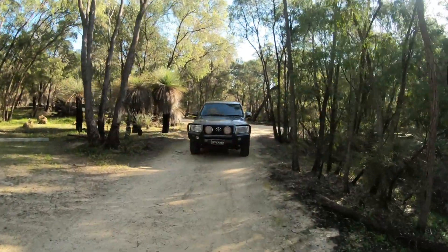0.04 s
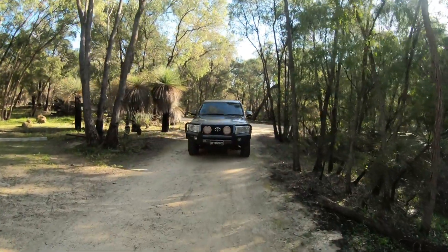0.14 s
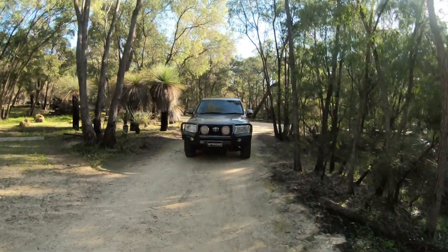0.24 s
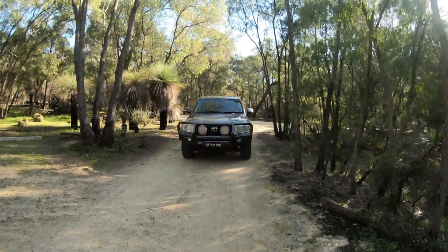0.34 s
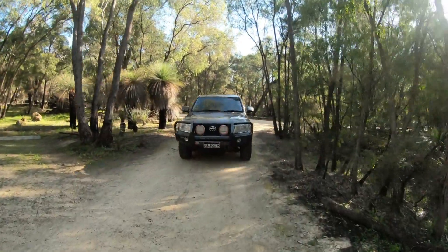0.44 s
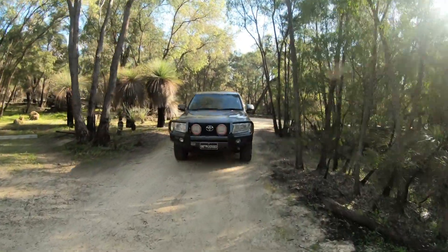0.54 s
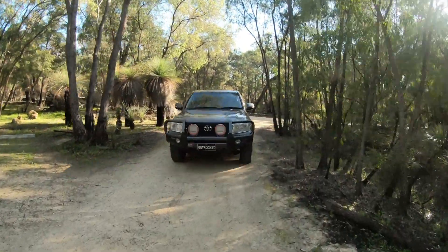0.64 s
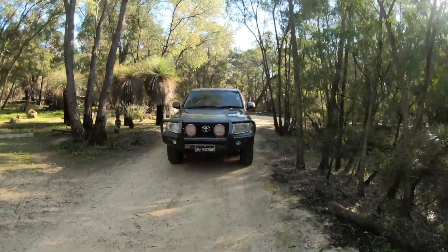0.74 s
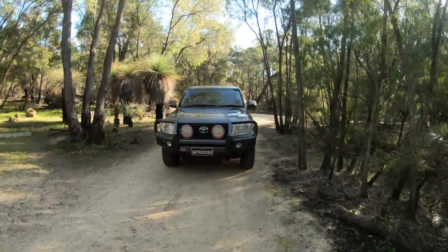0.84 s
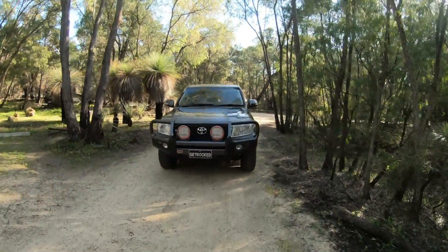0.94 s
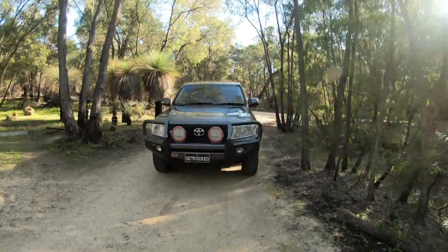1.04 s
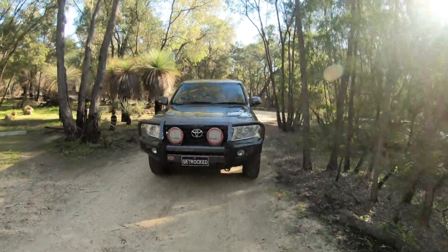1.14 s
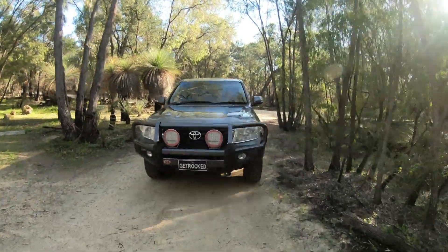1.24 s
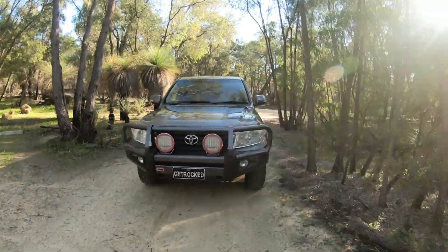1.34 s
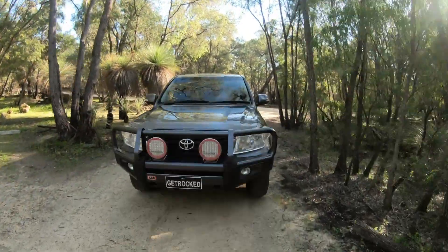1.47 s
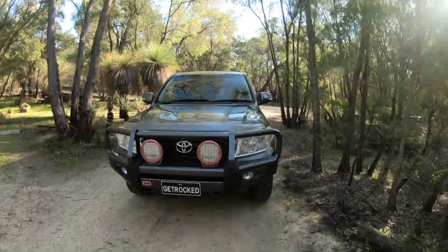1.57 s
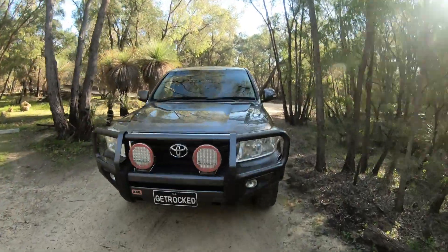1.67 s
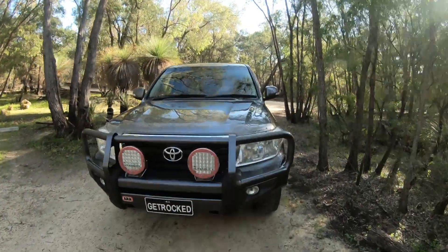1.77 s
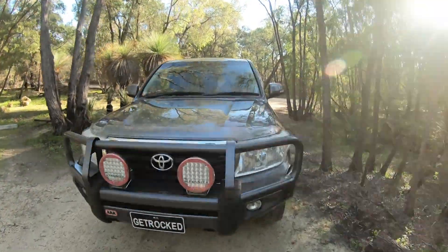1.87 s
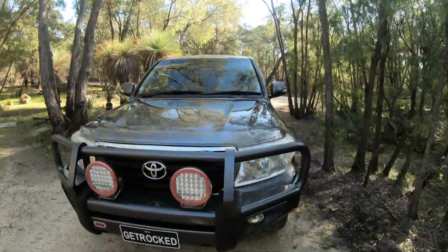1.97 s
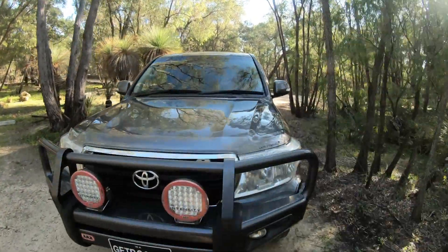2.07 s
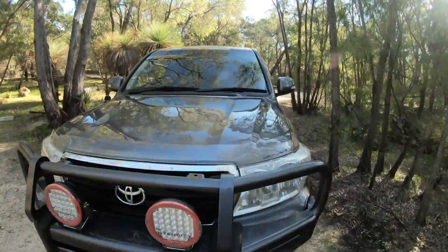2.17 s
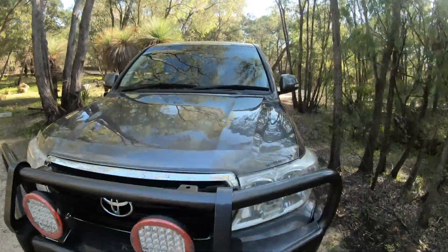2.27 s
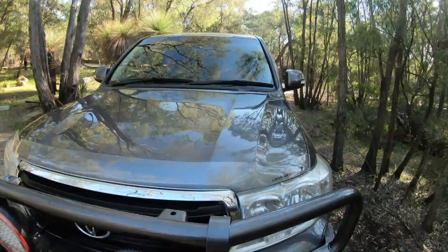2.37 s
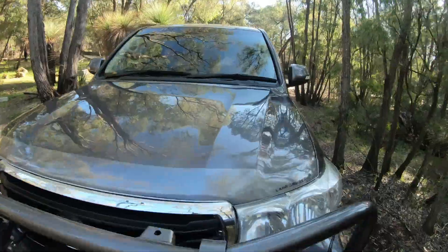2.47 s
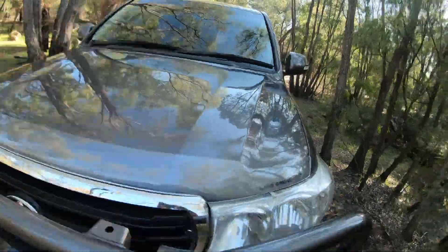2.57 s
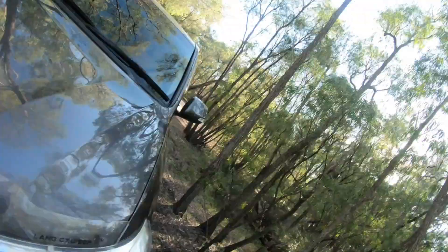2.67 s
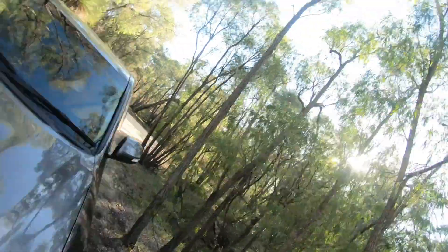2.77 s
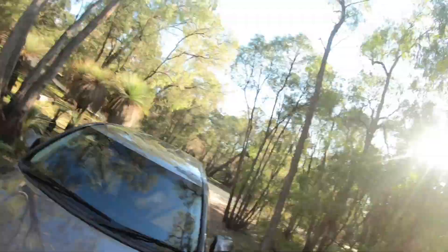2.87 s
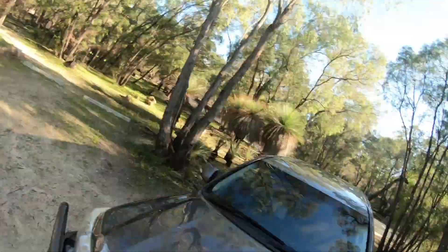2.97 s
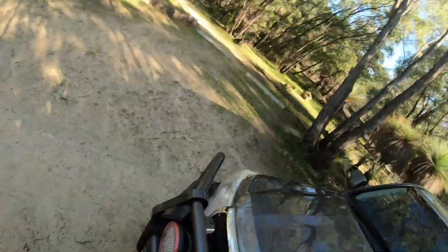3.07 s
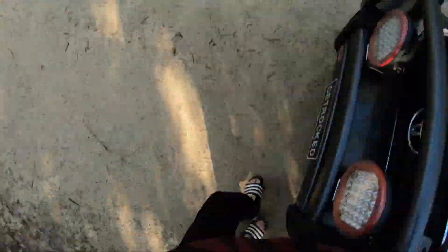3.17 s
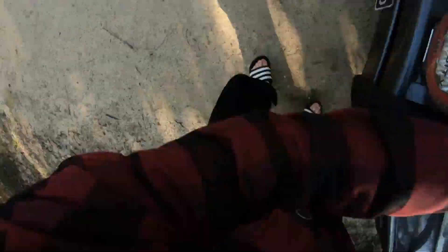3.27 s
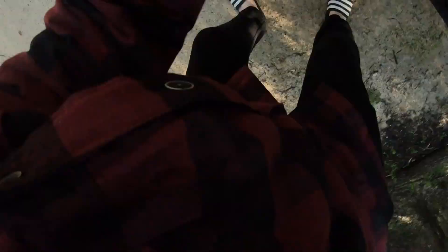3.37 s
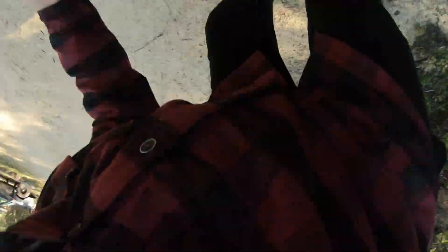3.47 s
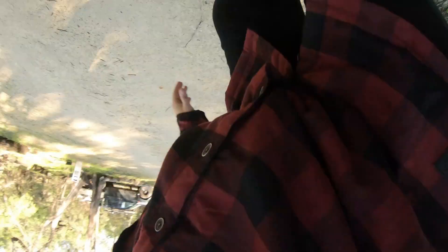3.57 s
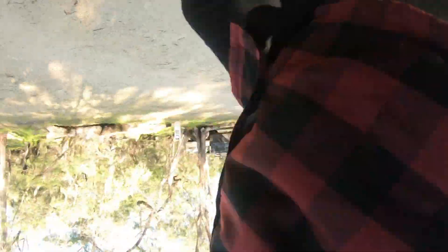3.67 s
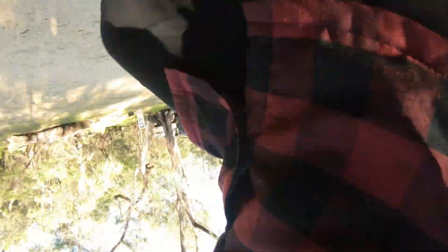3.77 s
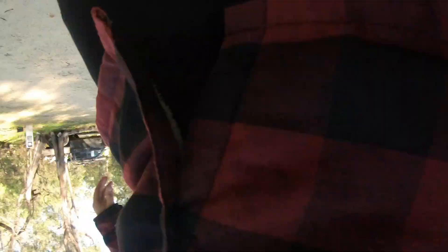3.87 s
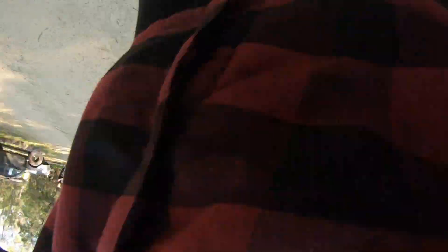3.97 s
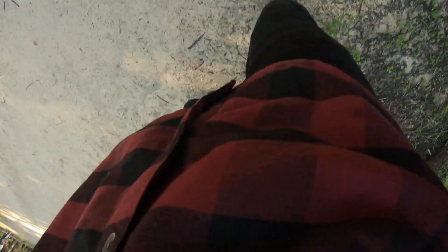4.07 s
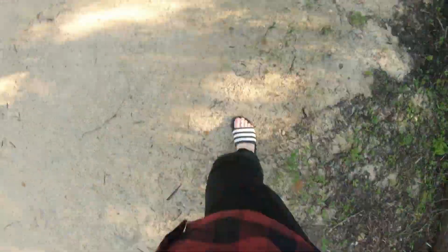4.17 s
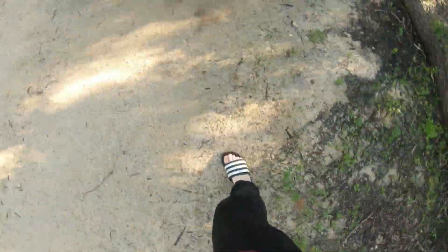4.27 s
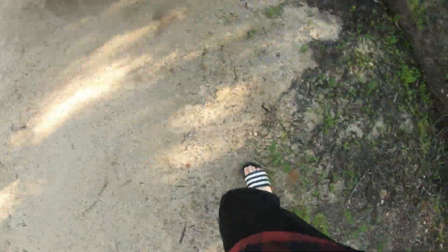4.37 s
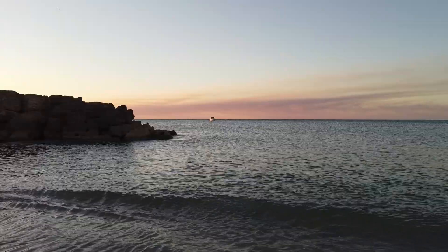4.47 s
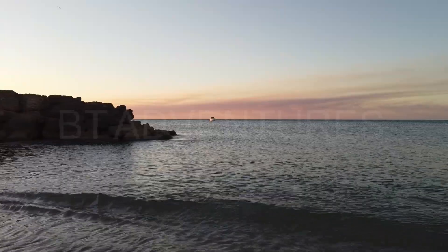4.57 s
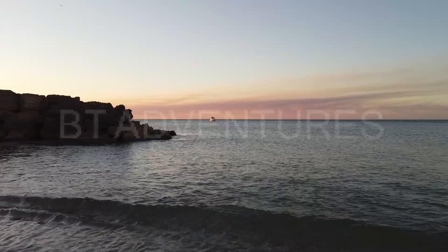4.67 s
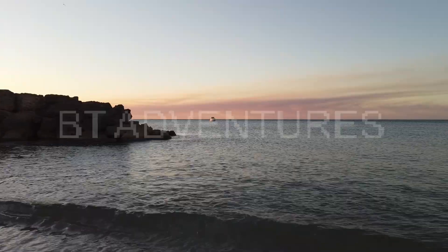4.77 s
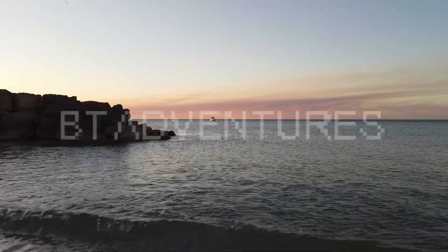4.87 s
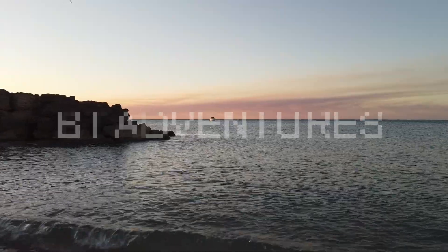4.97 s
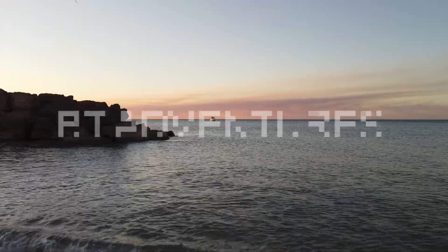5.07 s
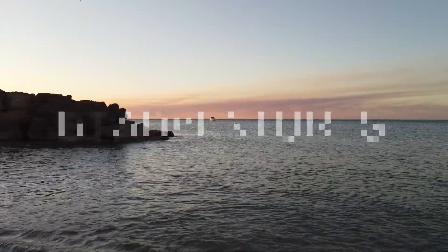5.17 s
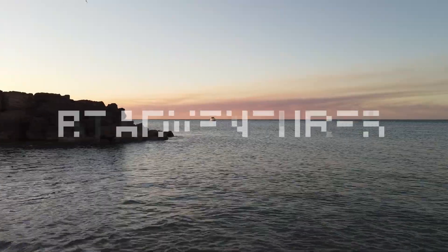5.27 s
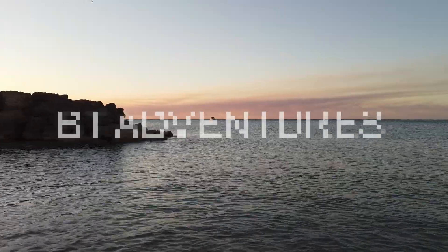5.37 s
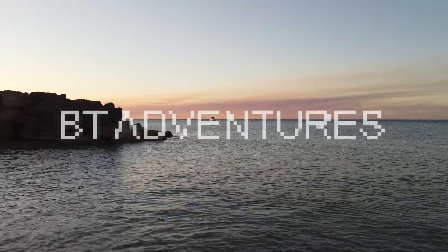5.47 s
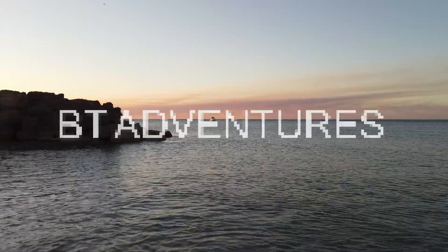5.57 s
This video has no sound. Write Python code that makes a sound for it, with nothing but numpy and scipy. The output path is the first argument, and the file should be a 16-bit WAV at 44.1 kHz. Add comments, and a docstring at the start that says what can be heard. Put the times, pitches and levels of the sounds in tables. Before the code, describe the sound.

Approaching diesel clatter and crunching tyres give way to handling booms and cloth rustle, a tiny silent gap, then a wave washing ashore.

```python
"""A bumpy dirt track: a diesel four-wheel-drive rolls up to a hand-held camera and brakes, then a silent gap and a beach.
The engine is firing pulses, low tones and knock-gated noise; tyres are noise, grains and ringing stones; a joint squeaks.
The camera is gripped and swung: taps ring its case, the grip booms, cloth rustles, air buffets the ports.
The beach fades in as coloured noise for wash, crest and foam, with ringing bubbles."""
import sys
import numpy as np
from scipy import signal
from scipy.fft import rfft, irfft, next_fast_len
from scipy.io import wavfile
from scipy.ndimage import uniform_filter1d, map_coordinates

SR = 44100
rng = np.random.default_rng(int(sys.argv[2]) if len(sys.argv) > 2 else 0)


def digitize_waveform(pressure):
    """Quantize a signal to 16-bit integers and store it at the path in sys.argv[1].

    Rows of a 2-D input are taken as channels; values are limited to [-1, 1].
    """
    field = np.atleast_2d(pressure).T
    bounded = np.clip(field, -1, 1)
    quanta = np.round(bounded * 32767).astype(np.int16)
    wavfile.write(sys.argv[1], SR, quanta)


N = 248283

# left-right likeness of the track's sounds: hz, correlation
TRACK_ALIKE = [(60, 0.98), (200, 1), (500, 0.98), (1000, 0.64), (2400, 0.16), (6000, 0.56), (15000, 0.18)]
# labouring over ruts: centre_s, half_s, throb_db, clatter_db, grit_db (all added)
RUTS = [(0.95, 0.18, -1.5, 1.3, 2), (1.808, 0.14, 2, 0.5, 1.5)]
BEACH_S = 4.612


def amp(db):
    """Decibels to gain."""
    return 10 ** (np.asarray(db) / 20)


def unit(x):
    """Scale to rms 1."""
    return x / np.sqrt(np.mean(x ** 2) + 1e-20)


def clock():
    """Time of every sample in seconds."""
    return np.arange(N) / SR


def along(points, hz):
    """Interpolate (hz, value) points on a log frequency axis."""
    f, v = np.transpose(points)
    return np.interp(np.log(hz + 1), np.log(f + 1), v)


def curves(rows):
    """One value per sample for each column after the time."""
    s, *cols = np.transpose(rows)
    return [np.interp(clock(), s, c) for c in cols]


def ramp(start_s, end_s):
    """0 at start_s, 1 at end_s, straight between, held outside."""
    return np.clip((clock() - start_s) / (end_s - start_s), 0, 1)


def bell(centre_s, half_s):
    """Gaussian swell of height 1."""
    return np.exp(-((clock() - centre_s) / half_s) ** 2 / 2)


def swells(rows):
    """Summed dB over time of (centre_s, half_s, dB, ..) rows, one curve per dB column."""
    return sum(np.outer(added_db, bell(s, half_s)) for s, half_s, *added_db in rows)


def wobble(rate_hz, size=N):
    """Smooth random curve with rate_hz knots a second."""
    knots = rng.standard_normal(int(size * rate_hz / SR) + 4)
    return map_coordinates(knots, [np.arange(size) / SR * rate_hz], order=2)


def filtered(x, response):
    """Apply a frequency response to x."""
    n = x.shape[-1]
    m = next_fast_len(n + 8192)
    return irfft(rfft(x, m) * response(np.fft.rfftfreq(m, 1 / SR)), m)[..., :n]


def coloured(x, spectrum):
    """Shape x by a spectrum, at rms 1."""
    return unit(filtered(x, lambda hz: amp(along(spectrum, hz))))


def stereo(pair, spectrum, alike):
    """Blend two unrelated signals into a coloured left and right of rms 1."""
    def mid_side_gains(hz):
        turn = np.arccos(np.clip(along(alike, hz), -1, 1)) / 2
        return amp(along(spectrum, hz)) * [np.cos(turn), np.sin(turn)]
    mid, side = filtered(pair, mid_side_gains)
    return unit(np.array([mid + side, mid - side]))


def noise(size=N):
    """Two unrelated white noises."""
    return rng.standard_normal((2, size))


def grains(rate_hz, spread_db):
    """Two streams of tiny random impacts, a few much larger than the rest."""
    hits = rng.random((2, N)) < rate_hz / SR
    signs = rng.choice([-1, 1], (2, N))
    sizes = amp(spread_db * np.minimum(rng.exponential(size=(2, N)), 4))
    return unit(hits * signs * sizes)


def patchy(pair, depth_db):
    """Give noise patches of random gain, a few hundred Hz wide and tens of ms long."""
    z = signal.stft(pair, nperseg=1024)[2]
    field = uniform_filter1d(rng.standard_normal(z.shape[1:]), size=5, axis=0)
    field = uniform_filter1d(field, size=5, axis=1)
    return signal.istft(z * amp(depth_db * unit(field)), nperseg=1024)[1][:, :N]


def pings(start_s, end_s, count, hz, octaves, cycles, spread_db):
    """Scatter of tiny rings, rms 1 within its time span, each with its own pitch, size and side."""
    t = np.arange(SR // 64) / SR
    when, side = rng.random((2, count, 1))
    pitch = np.clip(hz * 2 ** (octaves * rng.standard_normal((count, 1))), 300, 12000)
    strength = amp(spread_db * np.minimum(rng.exponential(size=(count, 1)), 3))
    rings = strength * np.sin(2 * np.pi * pitch * t) * amp(-60 * pitch * t / cycles)
    at = ((start_s + when * (end_s - start_s)) * SR).astype(int) + np.arange(len(t))
    pair = [np.bincount(at.ravel(), (rings * np.sqrt(share)).ravel(), N)[:N] for share in (side, 1 - side)]
    return unit(np.array(pair)) * np.sqrt((end_s - start_s) * SR / N)


def causal(gain, size):
    """Minimum-phase ring of a body with this gain over frequency."""
    cepstrum = irfft(np.log(np.maximum(gain(np.fft.rfftfreq(2 * size, 1 / SR)), 1e-6)))
    cepstrum[1:size] *= 2
    cepstrum[size + 1:] = 0
    return irfft(np.exp(rfft(cepstrum)))[:size]


def panned(db):
    """Left and right gains for a left-right level difference."""
    return amp(np.array([[db], [-db]]) / 2)


def add(track, s, sound):
    """Mix a short sound into the track at time s."""
    part = track[:, max(round(s * SR), 0):][:, :sound.shape[-1]]
    part += sound[..., :part.shape[-1]]


def by_distance(at_1m_db, loss_db):
    """Level that loses loss_db with each doubling of the truck's distance."""
    # truck rolls up and stops, then the camera is carried off: time_s, distance_m
    distance = [(0, 7.4), (1, 3.3), (2, 1.63), (2.5, 1.24), (3.3, 1.44), (3.8, 2.57), (4.46, 4.1)]
    return at_1m_db - loss_db * np.log2(np.maximum(curves(distance)[0], .5))


def leaning():
    """Left and right gains of clatter and tyres as the camera turns."""
    # sideways lean: time_s, left_right_db
    lean = [(0, -2), (.7, -3), (1.15, -1), (1.7, -4.5), (2.35, -3.5), (2.7, 0), (3.2, .3)]
    lean_db, = curves(lean)
    return amp(np.array([lean_db, -lean_db]) / 2)


def throb(firing, count, strength, first_db=-7.0, second_db=-7, order_loss_db=2.5):
    """Each firing pushes the exhaust; gas noise and the first two firing orders join in."""
    # exhaust spectrum: hz, density_db_per_hz
    exhaust = [(13, -38.5), (22, 9), (48, -17.5), (77, 0), (144, -7), (167, -7.5), (195, -6.5), (243, -8.5),
               (275, -15), (306, -21.5), (400, -24.5), (520, -42), (880, -120)]
    pulses = np.diff(count, prepend=0) * strength
    out = 0.35 * coloured(pulses, exhaust) + 0.83 * stereo(noise(), exhaust, TRACK_ALIKE)
    near = amp(by_distance(0, order_loss_db))  # deep orders come forward as the truck closes in
    first = amp(first_db + 1.8 * wobble(7.5)) * np.sin(2 * np.pi * firing)
    second = amp(second_db + 2.6 * wobble(8.3)) * np.sin(4 * np.pi * firing)
    out += near * np.sqrt(2) * (first + second)
    return amp(by_distance(at_1m_db=-32.5, loss_db=2.4) + swells(RUTS)[0]) * out


def clatter(firing, count, strength, scatter_db=0.8, block_hz=900, block_sharpness=0.34):
    """Diesel knock: each firing gates a burst of metallic noise; the block's low notes ring on between."""
    # engine block from the front: hz, density_db_per_hz
    block = [(210, -37), (350, -15), (409, -11.5), (447, 0.5), (706, 2.5), (780, -1), (1160, 1.5),
             (1360, -2), (1610, 2.5), (1940, -6.5), (2650, -11.5), (3130, -7), (3460, -17.5), (3830, -23.5),
             (5000, -29.5), (6500, -44), (11000, -120)]
    # engine block from behind the holder's body: hz, density_db_per_hz
    block_behind = [(200, -31), (330, -5), (450, -11), (600, -1.5), (850, -2), (1120, 1.5), (1380, -4.5),
                    (1600, 1.5), (2100, -10), (2550, -11), (3050, -12), (3600, -14.5), (4400, -17.5),
                    (5300, -26.5), (6300, -21.5), (8000, -42), (11000, -62)]
    # knock blurred at first, growing ever more distinct: time_s, sharpness_0_to_1
    knock_sharpness = [(.6, .17), (1.35, .36), (2.2, .44), (3.9, .6)]
    # camera turns away behind the holder's body, then faces the engine: time_s, added_db
    shade = [(2.6, 2.5), (2.82, -9.5), (3.45, -4.5), (3.62, -1), (3.7, 1), (4.05, 0.7), (4.26, 5),
             (4.3, 9.5), (4.46, 7.5)]
    sharpness, = curves(knock_sharpness)
    force = strength * amp(scatter_db * rng.standard_normal(400)[count])
    knock = unit(force * np.exp(sharpness * np.cos(2 * np.pi * firing) - sharpness ** 2 / 2))
    metal = unit(patchy(noise(), depth_db=2.5)) + .5 * grains(rate_hz=980, spread_db=2.5)
    ringing = filtered(metal, lambda hz: 1 / (1 + (hz / block_hz) ** 6))
    rattle = knock * (metal - ringing) + unit(knock ** block_sharpness) * ringing
    behind = ramp(2.8, 3.4)
    out = (1 - behind) * stereo(rattle, block, TRACK_ALIKE)
    out += behind * stereo(rattle, block_behind, TRACK_ALIKE)
    level_db = by_distance(at_1m_db=-40.5, loss_db=2.9) + swells(RUTS)[1] + curves(shade)[0]
    return amp(level_db) * out * leaning()


def fan():
    """Fan air: coloured noise that falls off steeply with distance."""
    # fan spectrum: hz, density_db_per_hz
    fan_air = [(60, -57.5), (200, -28), (290, 7.5), (450, -2), (620, 0), (900, -6.5), (1500, -28),
               (6000, -68.5)]
    return amp(by_distance(at_1m_db=-41, loss_db=7.6)) * stereo(noise(), fan_air, TRACK_ALIKE)


def engine():
    """Eight uneven cylinders drive throb and clatter from one firing phase; the fan runs alongside."""
    # idle sags as the truck is braked: time_s, firings_per_s
    firing_rate = [(1.5, 35.14), (3.4, 33.44)]
    firing = np.cumsum(curves(firing_rate)[0]) / SR
    count = (firing + .5).astype(int)
    cylinder_db = 1.4 * rng.standard_normal(8)[count % 8]
    strength = amp(cylinder_db + 0.78 * rng.standard_normal(400)[count])
    return throb(firing, count, strength) + clatter(firing, count, strength) + fan()


def tread(brake_s, stop_s, stopped_db=-16):
    """Sand and grit crush under the tread: noise and grains, fading as the truck brakes."""
    # tread spectrum: hz, density_db_per_hz
    tread_spectrum = [(1300, -18), (2200, 1), (3100, -3), (3800, 1), (5000, -3), (5700, -7), (7000, -7),
                      (7900, -14.5), (10500, -22), (11800, -30.5), (14000, -36.5), (15800, -50.5)]
    crunch = noise() * amp(1.8 * wobble(40.11)) + 0.39 * grains(rate_hz=380, spread_db=5.0)
    level_db = by_distance(at_1m_db=-48, loss_db=1.88) + swells(RUTS)[2] + stopped_db * ramp(brake_s, stop_s)
    return amp(level_db) * stereo(crunch, tread_spectrum, TRACK_ALIKE)


def rut_crunches(brake_s, dull_hz=4500):
    """A wheel drops into a rut: pebble rings and grit noise under fast-rising, decaying envelopes."""
    # crunches: start_s, level_db, rise_s, t60_s
    crunches = [(1.695, -33.5, .008, 0.32), (1.747, -36, .004, 0.24)]
    # grit spectrum: hz, density_db_per_hz
    grit = [(400, -9), (1000, 4), (1500, -1), (2200, 7), (3000, -8), (3700, -6), (5500, -8), (8000, -21),
            (12000, -49), (16000, -48.5)]
    crush = 0
    for s, db, rise_s, t60_s in crunches:
        crush += amp(db - 60 * np.maximum(clock() - s - rise_s, 0) / t60_s) * ramp(s, s + rise_s)
    pebbles = pings(crunches[0][0], brake_s, count=500, hz=1890, octaves=.65, cycles=7, spread_db=6.0)
    # sand softens every contact; the level is kept
    softened = unit(filtered(pebbles, lambda hz: 1 / (1 + (hz / dull_hz) ** 4))) * np.std(pebbles)
    return crush * (0.49 * softened + 0.6 * stereo(noise(), grit, TRACK_ALIKE))


def spat_stones(dull_hz=8500):
    """Stones spat from under a tyre: noise through four resonances, treble deadened by sand."""
    # resonances: hz, width_hz, level_db
    modes = [(1800, 550, -2.5), (2470, 650, 0), (3830, 310, 1.5), (5640, 1400, -15)]
    # stones: start_s, level_db, t60_s, pitch_ratio
    stones = [(0.0698, -31, 0.02, 1), (0.371, -35, 0.026, 1.1), (0.4347, -38, 0.071, .95),
              (1.1608, -35, 0.021, 1.2), (1.5653, -35, 0.03, 1.05), (1.6585, -22, 0.014, .8),
              (1.6605, -18.5, 0.014, 1.03), (1.6847, -28, .012, 1.25), (1.697, -30, 0.011, 1.2),
              (1.7025, -29, .016, 1.05), (1.7075, -24.5, 0.018, .95), (1.712, -29, .02, .9),
              (1.7498, -31, .016, .7), (1.768, -24.5, 0.008, .68), (2.2237, -39, 0.031, .9),
              (2.3014, -32, 0.026, .98)]

    def ring(f):
        return sum((-1) ** k * amp(db) * 1j * f * width / (hz * hz - f * f + 1j * f * width)
                   for k, (hz, width, db) in enumerate(modes))

    out = np.zeros((2, N))
    t = np.arange(SR // 5) / SR
    for s, db, t60_s, pitch in stones:
        burst = noise(size=len(t)) + rng.standard_normal(len(t))
        crack = unit(filtered(burst, lambda f: ring(f / pitch) / (1 + (f / dull_hz) ** 6)))
        add(out, s, amp(db - 0.5 - 60 * t / t60_s) * (1 - np.exp(-t / 0.0007)) * crack)
    return out


def tyres(brake_s=2.28, stop_s=3.14):
    """Tread, rut crunches and spat stones, all leaning to one side."""
    return (tread(brake_s, stop_s) + rut_crunches(brake_s) + spat_stones()) * leaning()


def squeaks(low_swell_db=9, flutter_db=2.5, bright_hz=2750, bright_width_hz=550, skew=0.72, fullness=0.55,
            echo_db=-10, echo_t60_s=0.29):
    """A dry suspension joint stick-slips: eight partials swell, arch in pitch and dull; trees scatter it."""
    # squeaks: start_s, length_s, slips_per_s, arch_share, roughness_0_to_1, level_db, bright_loss_db
    slips = [(0.008, 0.068, 1130, 0.06, 0.1, -50, 6.5), (0.886, 0.088, 500, 0.06, 0.028, -43.5, 10),
             (1.065, .087, 1290, 0.115, 0.018, -37.2, 28)]
    # joint resonance: hz, level_db
    joint = [(500, -25), (1050, -7), (1300, 1), (1450, -4.5), (2100, -9), (2650, -2), (2900, -10),
             (3150, -15.5), (3750, -3), (3950, -9), (4300, -29), (5500, -48)]
    out = np.zeros((1, N))
    for s, length_s, hz, arch, rough, db, dulling_db in slips:
        u = np.linspace(0, 1, int(length_s * SR), endpoint=False)
        arching = arch * np.sin(np.pi * u ** skew)
        pitch = hz * (1 + arching + rough * wobble(1000, size=len(u)))
        partials = np.outer(np.arange(1, 9), pitch)
        bright = np.exp(-((partials - bright_hz) / bright_width_hz) ** 2)
        colour_db = along(joint, partials) - dulling_db * (u - .5) * bright
        colour_db[0] += low_swell_db * (u - .5)  # lowest partial gains towards the end
        colour_db += flutter_db * np.array([wobble(175, size=len(u)) for _ in partials])
        tone = np.sum(amp(colour_db) * np.sin(2 * np.pi * np.cumsum(partials, axis=1) / SR), axis=0)
        add(out, s, np.sin(np.pi * u) ** fullness * amp(db) * np.sqrt(2) * tone)
    t = np.arange(SR // 4) / SR
    trees = noise(size=len(t)) * amp(-60 * t / echo_t60_s)
    trees /= np.linalg.norm(trees[0])
    echo = signal.fftconvolve(out, trees, axes=1)[:, :N]
    return panned(2.7) * out + amp(echo_db) * echo


def case_taps(ring_db=9, ring_octaves=0.72, chatter_db=-13):
    """Fingers and a button tap the case: a sharp contact and short chatter ring one spot on it."""
    # taps: start_s, level_over_1ms_db, left_right_db, chatter_t60_s, ring_hz, dull_above_hz
    clicks = [(0.113, -34.5, -3, 0.012, 5000, 7950), (2.4502, -34, -13, 0.041, 6900, 11000),
              (2.513, -38, -6, 0.014, 6900, 12000), (2.526, -28, -5, 0.0091, 3000, 13000),
              (2.559, -41, -9, .01, 7000, 14000), (2.581, -34, 2, .008, 3400, 4500),
              (2.606, -35, 2, 0.023, 4960, 12000), (2.6335, -27, 7, 0.0064, 5600, 13000),
              (2.642, -38, 10, 0.01, 4500, 14000), (2.7676, -24, 1, .014, 7640, 15000),
              (2.771, -25, 0.5, 0.12, 2200, 2700), (3.0156, -36.5, -1, 0.016, 5500, 6000),
              (3.3976, -25.5, -0.5, 0.011, 2900, 5500), (3.7599, -29.5, 1.5, 0.012, 2590, 4000),
              (3.782, -34.5, 0, 0.018, 4200, 7000), (4.211, -51, 2, 0.013, 7000, 9000)]
    # case response: hz, level_db
    case = [(600, -16), (1500, 10.5), (3000, 1), (5000, 0), (7500, -3), (10000, -4.5), (13000, -13.5),
            (16000, -22)]
    out = np.zeros((2, N))
    t = np.arange(SR // 4) / SR
    for s, db, pan_db, t60_s, ring_hz, dull_hz in clicks:
        def spot(f):
            boost_db = ring_db * np.exp(-(np.log2((f + 1) / ring_hz) / ring_octaves) ** 2)
            return amp(along(case, f) + boost_db) / np.hypot(1, (f / dull_hz) ** 3)
        chatter = (noise(size=len(t)) + rng.standard_normal(len(t))) / 2
        contact = (t == 0) + amp(chatter_db - 60 * t / t60_s) * chatter
        tick = signal.fftconvolve(contact, causal(spot, size=1024)[None], axes=1)
        tick /= np.sqrt(np.sum(tick ** 2) / (2 * SR / 1000))  # energy as if spread over 1 ms
        add(out, s, panned(pan_db) * amp(db) * tick)
    return out


def sleeve_rubs(scrape_db=4):
    """Sleeve and hand slide on the case: tilted cloth noise broken into tiny catches."""
    # rubs: centre_s, level_db, half_s, tilt_db_per_octave
    rubs = [(2.461, -45, 0.0061, 3), (2.758, -35, 0.0074, -1), (2.769, -38.5, 0.017, -5),
            (2.77, -42.5, 0.017, 8), (3.229, -49.5, 0.11, 0), (3.398, -34.5, 0.01, 0),
            (3.463, -51.5, 0.057, 4), (3.519, -34, 0.0051, -12), (3.576, -39, 0.021, -8.5),
            (3.684, -45.5, 0.039, 0), (3.773, -48.5, 0.2, 0.5), (3.829, -40, 0.0096, -4)]
    # cloth spectrum: hz, density_db_per_hz
    cloth = [(300, -1.5), (750, 6), (1400, 5.5), (2800, 3), (4000, -3.5), (5200, -5.5), (8000, -14.5),
             (11000, -29), (16000, -45.5)]
    out = np.zeros((2, N))
    t = np.arange(SR // 4) / SR
    for s, db, half_s, tilt_db in rubs:
        tilted = [(hz, level_db + tilt_db * np.log2(hz)) for hz, level_db in cloth]
        fibres = coloured(noise(size=len(t)) + 1.5 * rng.standard_normal(len(t)), tilted)
        catches = unit(amp(scrape_db * wobble(445.2, size=len(t))))
        swell = np.exp(-abs(t - t.mean()) / half_s)
        add(out, s - t.mean(), amp(db + 3.5) * swell * catches * fibres)
    return out


def grip(attack_s=0.0019, stiffening=0.24, relax_s=0.012, overtone=1.69, overtone_db=-11):
    """The hand knocks the grip, which booms; pitch sinks as the hand's pressure relaxes."""
    # knocks: start_s, level_db, settled_hz, t60_s, left_right_db
    knocks = [(2.797, -22, 230, 0.041, 8.5), (2.819, -19, 135, .09, 9), (2.851, -16.5, 154, 0.2, -3),
              (2.872, -27, 175, 0.071, -5), (2.905, -11.5, 144.2, 0.1, 2), (2.935, -23, 250, 0.052, -4),
              (2.951, -17, 390, 0.05, -3), (2.967, -17, 400, 0.031, -4), (3.051, -16, 85, 0.13, 2),
              (3.092, -12, 112, 0.12, -1.5), (3.268, -7, 135, 0.022, 1), (3.282, -19.5, 315, 0.035, -4),
              (3.724, -20, 150, .06, -9), (3.808, -18, 140, 0.048, 0), (4.021, -21, 95, 0.049, -1)]
    out = np.zeros((2, N))
    t = np.arange(SR // 4) / SR
    for s, db, hz, t60_s, pan_db in knocks:
        phase = 2 * np.pi * np.cumsum(hz * (1 + stiffening * np.exp(-t / relax_s))) / SR
        decay = amp(-60 * t / t60_s)
        boom = decay * np.sin(phase) + amp(overtone_db) * decay ** 2 * np.sin(overtone * phase)
        add(out, s, panned(pan_db) * amp(db) * (1 - np.exp(-t / attack_s)) * boom)
    return out


def shirt(start_s=2.934, rise_s=0.25, level_db=-52.5, catch_db=1.5):
    """Flannel rustles beside the lowered camera: wobbling noise and sparse grains."""
    # flannel spectrum: hz, density_db_per_hz
    flannel = [(1300, -17), (2200, 5), (3100, 5.5), (4000, 1), (5400, -12.5), (7000, -12.5), (8000, -13),
               (10500, -26.5), (12000, -33), (15800, -59)]
    fibres = noise() * amp(catch_db * wobble(40)) + 0.44 * grains(rate_hz=240, spread_db=2.5)
    slow_rise_db = -0.5 * (1 - ramp(4.2, 4.7))
    return ramp(start_s, start_s + rise_s) * amp(level_db + slow_rise_db) * stereo(fibres, flannel, TRACK_ALIKE)


def air_rumble():
    """Air rolls over the swinging ports as low, wobbling noise."""
    # camera swings: centre_s, level_db, half_s
    swings = [(2.57, -25, 0.091), (2.895, -23, 0.068), (3.135, -25, 0.081), (3.284, -22.5, 0.038),
              (3.433, -28, 0.067), (3.755, -27, 0.069), (4.01, -30.5, 0.075)]
    # rumble spectrum: hz, density_db_per_hz
    rumble = [(12, -38), (20, 9), (52, 0), (118, -3), (151, -3), (209, -12.5), (344, -20), (600, -27.5),
              (780, -53), (1320, -120)]
    airflow = sum(amp(db) * bell(s, half_s) for s, db, half_s in swings)
    return airflow * amp(1.9 * wobble(25.05)) * stereo(noise(), rumble, [(50, 0.84), (400, 0.36)])


def thumps():
    """Single pushes of air or hand: one suck and one push of pressure each."""
    # pushes: centre_s, level_db, hz, left_right_db
    pushes = [(2.456, -20, 72.4, -12), (2.476, -18, 39.8, -5), (2.531, -16, 66, -19), (2.574, -11, 35, -4),
              (2.611, -18.5, 83, -15), (2.636, -18, 30.7, 17), (2.907, -10, 59.4, 4),
              (3.236, -19, 59.6, -15), (3.3, -14.5, 73, 0), (3.609, -22, 74.4, 13), (3.707, -19.5, 86, 0),
              (3.724, -19, 66, 0), (3.826, -16, 104, -2), (3.904, -18.5, 61.4, .5), (4.057, -21, 74, -1),
              (4.302, -26, 124, 8)]
    out = np.zeros((2, N))
    t = np.arange(-SR // 8, SR // 8) / SR
    for s, db, hz, pan_db in pushes:
        u = 2 * np.pi * hz * t
        add(out, s + t[0], panned(pan_db) * amp(db - 1.0) * u * np.exp((1 - u * u) / 2))
    return out


def port_eddies(order=1.59, dull_hz=1700, flutter_db=3, spanning_hz=60, opposed=0.39):
    """Eddies flutter in the ports: bursts of band-passed noise, partly opposed left to right."""
    # eddies: centre_s, level_db, half_s, centre_hz, left_right_db
    eddies = [(2.453, -32, 0.0053, 295, -10), (2.525, -30.5, 0.0066, 232, -16),
              (2.606, -32.5, 0.01, 224.6, -4), (2.769, -38, 0.0095, 840, 0.5), (2.81, -27.5, 0.01, 270, 13),
              (2.868, -31, 0.022, 620, -1.5), (2.89, -20.5, 0.026, 175, -6.5),
              (2.963, -23.5, 0.0087, 500, -3), (3.028, -34, .013, 405, 1.5), (3.112, -28.5, 0.018, 159, -1),
              (3.225, -31.5, 0.026, 465, -5), (3.271, -23.5, 0.0036, 570, 0.5),
              (3.29, -26, 0.016, 450, -2.5)]
    out = np.zeros((2, N))
    t = np.arange(-SR // 8, SR // 8) / SR
    for s, db, half_s, hz, pan_db in eddies:
        def band(f):
            ratio = f / hz
            return (ratio / np.hypot(1 - ratio ** 2, 0.75 * ratio)) ** order / (1 + (f / dull_hz) ** 4)
        swirl = noise(size=len(t))
        # small eddies push one port while they pull the other
        swirl = swirl + (spanning_hz / hz - opposed) * swirl[::-1]
        swirl = swirl * amp(flutter_db * wobble(202.8, size=len(t)))  # vortices peel off unevenly
        swirl = filtered(swirl, band)
        swell = np.exp(-(t / half_s) ** 2 / 2)
        add(out, s + t[0], panned(pan_db) * amp(db) * unit(swirl * swell) * np.sqrt(np.mean(swell ** 2)))
    return out


def pops(dull_hz=1350):
    """A vortex collapses on a port: one pointed dip in pressure, strongest at the port it passes."""
    # collapses: centre_s, level_at_louder_port_db, hz, left_right_db
    collapses = [(2.7993, -15.5, 250, 16), (2.812, -14, 400, 23), (2.819, -17.5, 480, 12),
                 (2.84, -19.5, 380, -10), (2.864, -11, 211, -7), (2.872, -15, 400, 9),
                 (2.878, -12, 230, -14.5), (2.893, -15, 520, -11.5), (2.9113, -16, 150, 7),
                 (2.9625, -18, 650, -5.5), (3.27, -17.5, 417, 8), (3.3031, -14.5, 228, 4)]
    out = np.zeros((2, N))
    t = np.arange(-SR // 32, SR // 32) / SR
    for s, db, hz, pan_db in collapses:
        u = 2 * np.pi * hz * abs(t)
        dip = filtered((u - 1) * np.exp(-u), lambda f: 1 / (1 + (f / dull_hz) ** 4))
        add(out, s + t[0], panned(pan_db) * amp(db - abs(pan_db) / 2) * dip / np.max(abs(dip)))
    return out


def fade_in(full_db, length_s, power):
    """Gain of a beach layer as it fades in."""
    return amp(full_db) * ramp(BEACH_S, BEACH_S + length_s) ** power


def bubbles(t60_s=0.028, splash_width_hz=1700):
    """Drops and bubbles: a decaying ring, its pitch climbing as it surfaces, with a noise splash."""
    # bubbles: start_s, level_db, start_hz
    drops = [(4.771, -29.5, 2210), (4.81, -29.5, 3500), (5.032, -28, 2650), (5.274, -25, 3830),
             (5.309, -26, 3870), (5.329, -26, 2530), (5.375, -21.5, 4650), (5.397, -39, 2160),
             (5.51, -27, 7560)]
    out = np.zeros((2, N))
    t = np.arange(SR // 16) / SR
    for s, db, hz in drops:
        ring = np.sin(2 * np.pi * hz * t * (1 + 3 * t))
        splash = unit(filtered(noise(size=len(t)), lambda f: np.exp(-((f - hz) / splash_width_hz) ** 2)))
        envelope = amp(db - 60 * t / t60_s) * (1 - np.exp(-t / 0.00029))
        add(out, s, panned(rng.normal(0, 3)) * envelope * (0.5 * ring + 0.62 * splash))
    return out


def surf(churn_db=1.5, split_hz=520, babble_db=-6):
    """A low wave washes in: heaving wash, spilling crest, fizzing foam and bubbles."""
    # left-right likeness: hz, correlation
    sea_alike = [(60, 1), (200, 0.99), (550, .92), (1600, 0.67), (5000, 0.024), (12000, 0.93)]
    # wave slaps the sand: centre_s, half_s, wash_db, spill_db, foam_db (all added)
    surges = [(4.772, 0.011, 2.5, 3, 1), (4.812, 0.0072, -2, 5, 3.5), (4.852, .018, 1.5, 6, 3),
              (5.0, 0.015, 2, 3, 2), (5.272, 0.023, 1, 3.5, 4), (5.325, .014, -1, 3, -0.5),
              (5.395, 0.032, -0.5, 0, 1.5), (5.5, 0.025, 1, 2, 2.5)]
    # wash spectrum: hz, density_db_per_hz
    wash = [(13, -42), (22, -9), (81, -1.5), (157, -0.5), (227, -4), (289, 0), (369, -4.5), (564, -5.5),
            (600, -8), (780, -10.5), (846, -12.5), (1650, -19.5), (2800, -30.5), (3640, -40), (6160, -120)]
    # crest spectrum: hz, density_db_per_hz
    spill = [(100, -120), (400, -23), (800, 0.5), (1200, 1), (1700, 0), (2200, -3.5), (2900, -18),
             (4000, -37), (7000, -120)]
    # foam spectrum: hz, density_db_per_hz
    foam = [(1500, -29), (2500, -3), (3200, 1), (4000, -1.5), (5000, -1.5), (6000, -1.5), (7100, -1.5),
            (8500, -8), (10000, -14.5), (12000, -26.5), (15500, -36)]
    wash_db, spill_db, foam_db = swells(surges)
    water = stereo(noise(), wash, sea_alike)
    deep = filtered(water, lambda hz: 1 / (1 + (hz / split_hz) ** 4))
    churn = deep * amp(churn_db * wobble(16)) + (water - deep) * amp(churn_db * wobble(11))
    out = fade_in(full_db=-19, length_s=0.83, power=0.95) * amp(wash_db) * churn
    babble = pings(BEACH_S, N / SR, count=260, hz=1780, octaves=0.71, cycles=27, spread_db=3.5)
    crest = stereo(patchy(noise(), depth_db=3.5), spill, sea_alike) + amp(babble_db) * babble
    out += fade_in(full_db=-34, length_s=0.59, power=0.82) * amp(spill_db) * crest
    fizz = stereo(noise() + 0.44 * grains(rate_hz=1200, spread_db=7.0), foam, sea_alike)
    out += fade_in(full_db=-39, length_s=0.56, power=0.74) * amp(foam_db + 1.2 * wobble(20)) * fizz
    return (out + bubbles()) * panned(-0.66)


def narrowing(track, narrow_hz=2500, treble_width=.12, wide=1.22, close_s=3.134, closing_db_per_s=51):
    """The stereo width shrinks, treble first, then closes to near mono."""
    left, right = track
    mid, side = (left + right) / 2, (left - right) / 2
    narrowed = filtered(side, lambda hz: treble_width + (1 - treble_width) / (1 + (hz / narrow_hz) ** 8))
    treble_closing = ramp(2.5, 3.13)
    side = (1 - treble_closing) * side + treble_closing * narrowed
    width = wide * amp(-closing_db_per_s * np.maximum(clock() - close_s, 0))
    return np.array([mid + width * side, mid - width * side])


def scene(cut_s=4.464):
    """The track, narrowing in stereo; a silent gap; the beach."""
    truck = engine() + tyres() + squeaks()
    hands = case_taps() + sleeve_rubs() + grip() + shirt()
    buffeting = air_rumble() + thumps() + port_eddies() + pops()
    before_cut = np.clip((cut_s - clock()) / .002, 0, 1)
    return before_cut * narrowing(truck + hands + buffeting) + surf()


def record(dry, bass_hz=25, top_hz=15800):
    """Roll off the deepest bass and cut steeply above top_hz."""
    def response(hz):
        return hz ** 2 / np.hypot(hz ** 2, bass_hz ** 2) / np.sqrt(1 + (hz / top_hz) ** 200)
    return filtered(dry, response)


dry = scene()
out = record(dry)
digitize_waveform(out)
```